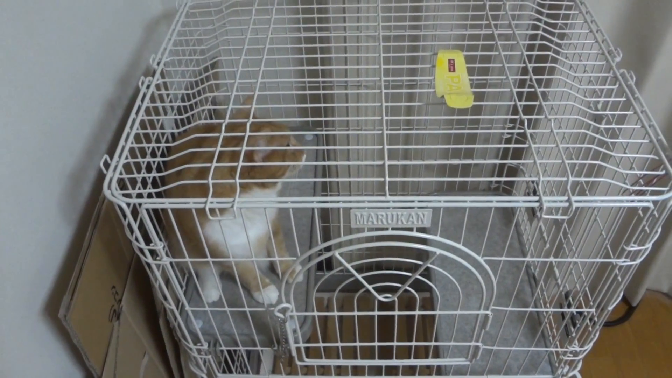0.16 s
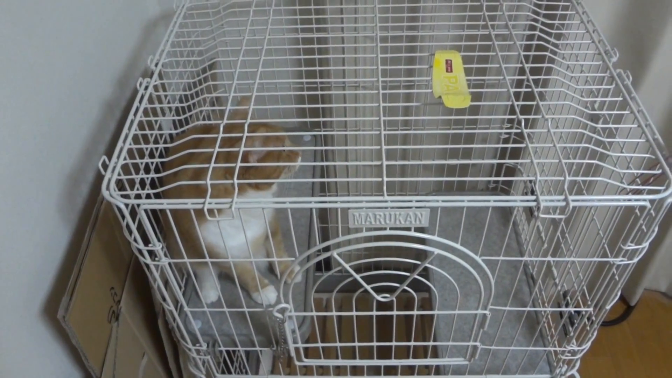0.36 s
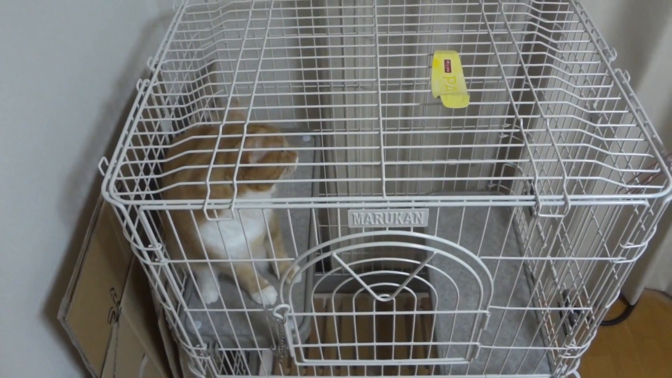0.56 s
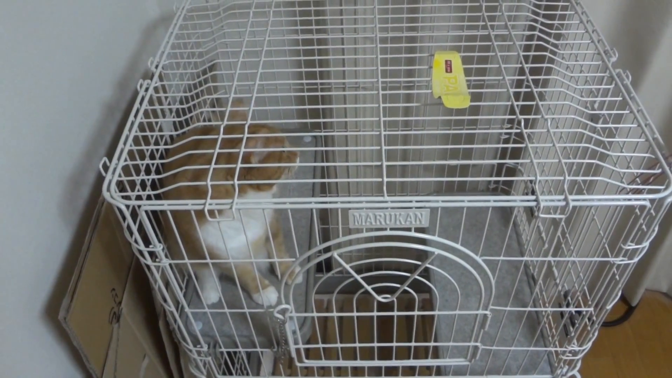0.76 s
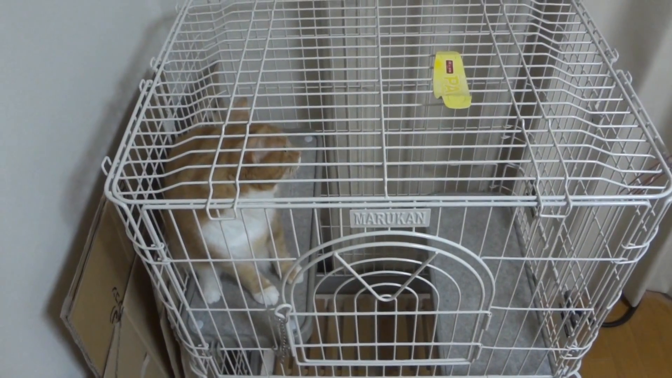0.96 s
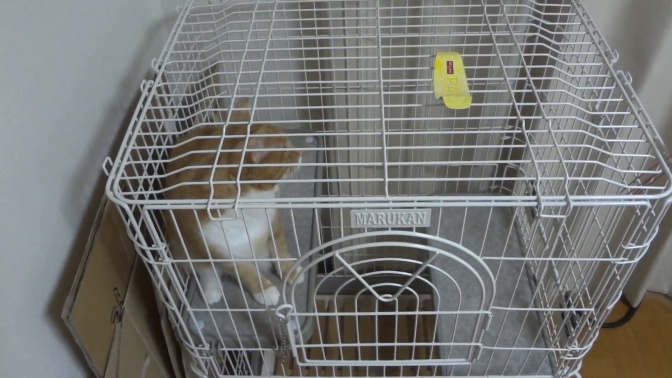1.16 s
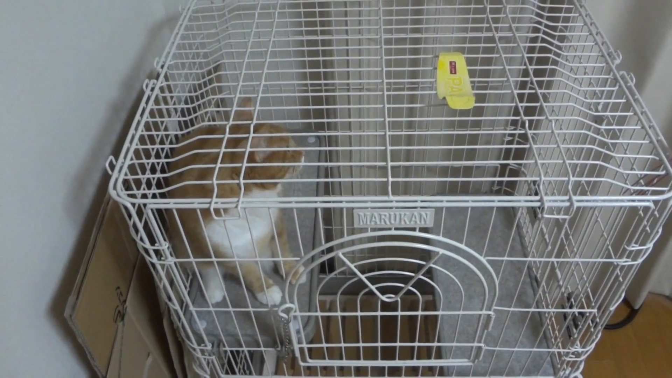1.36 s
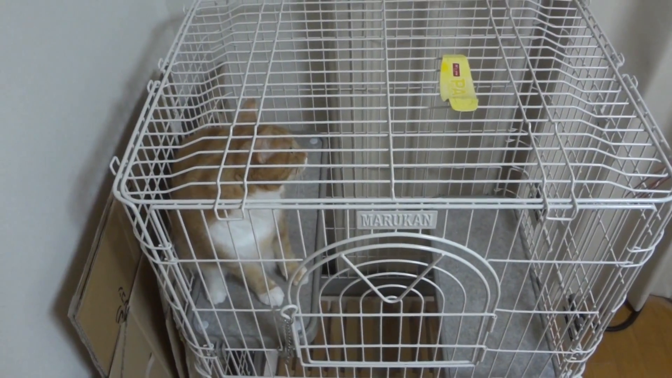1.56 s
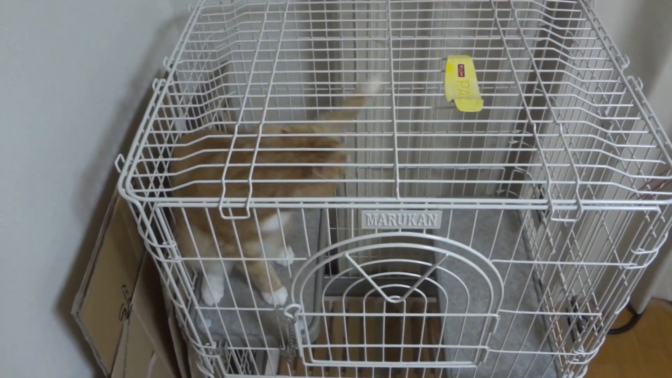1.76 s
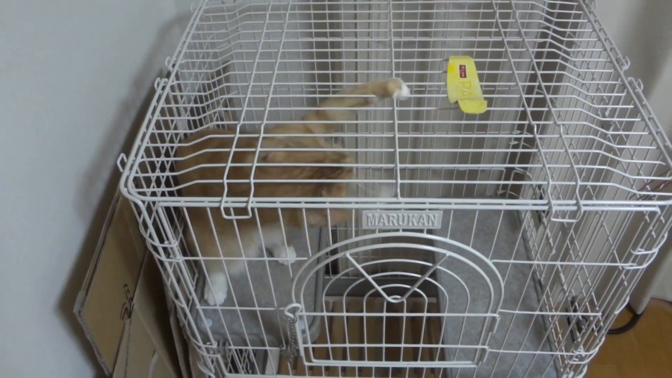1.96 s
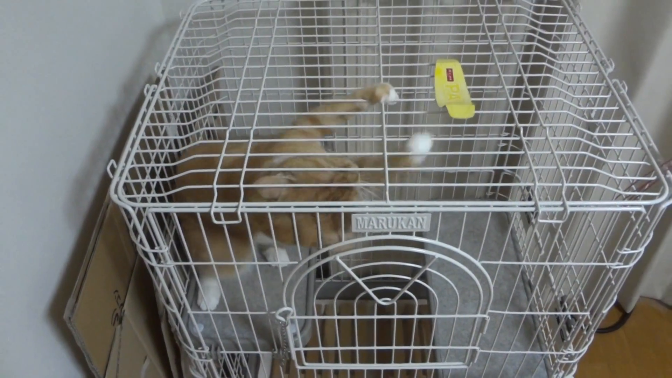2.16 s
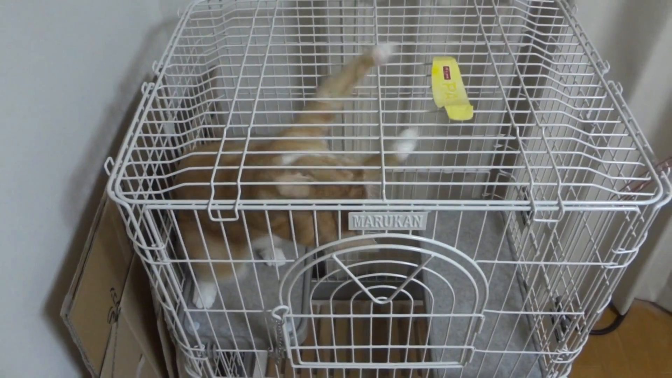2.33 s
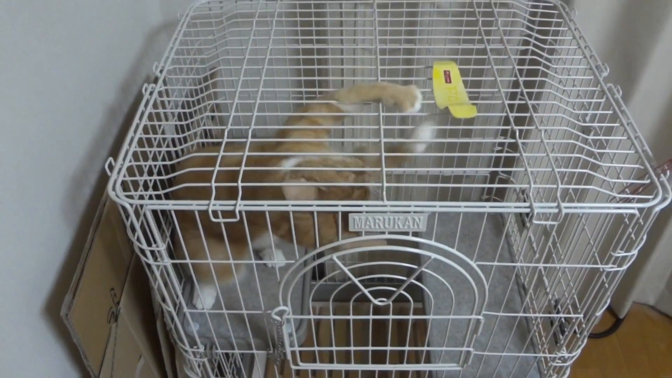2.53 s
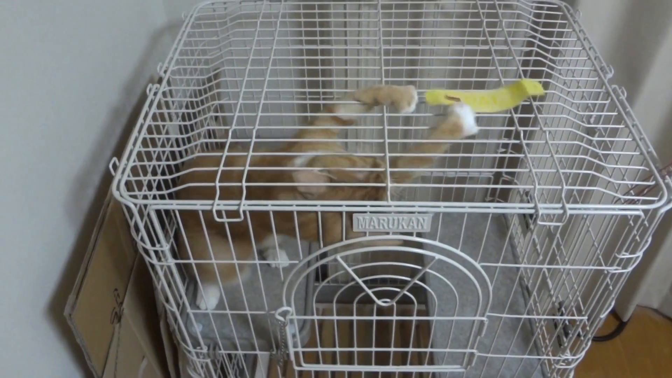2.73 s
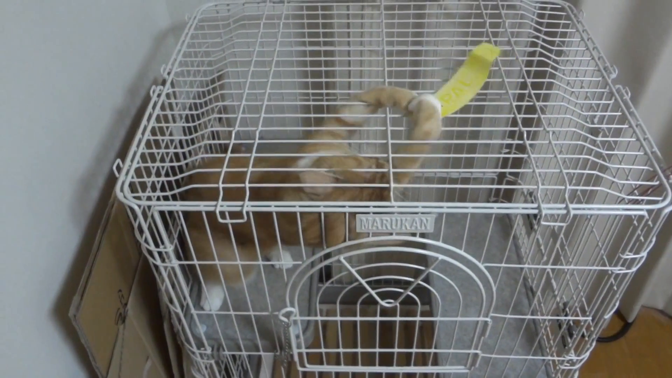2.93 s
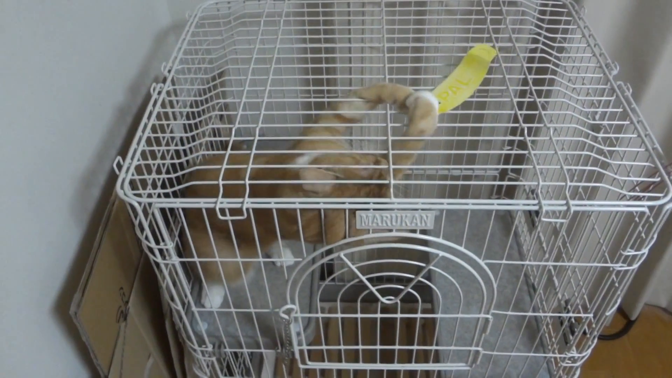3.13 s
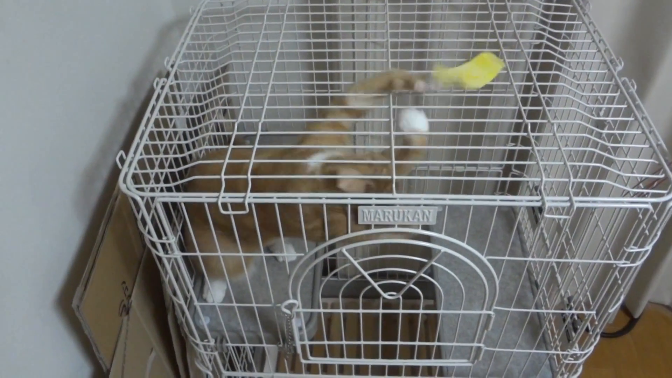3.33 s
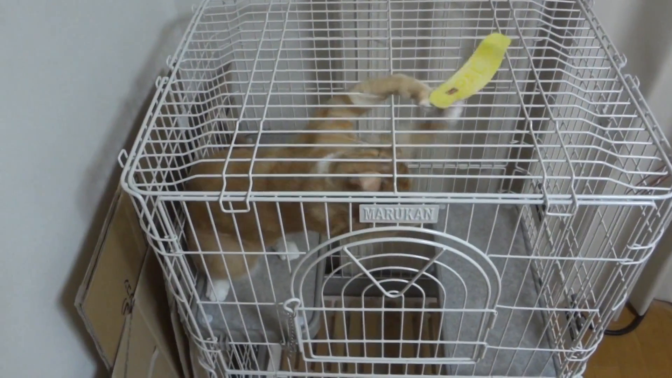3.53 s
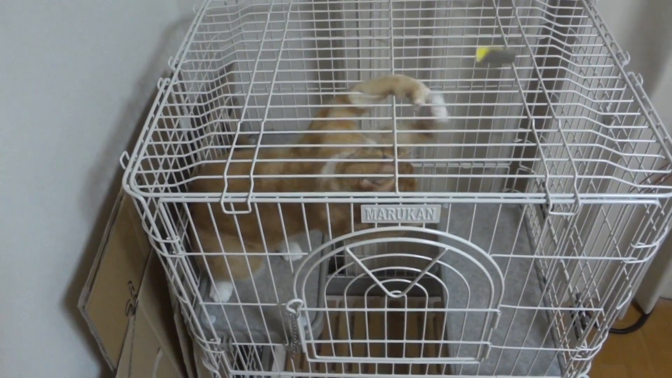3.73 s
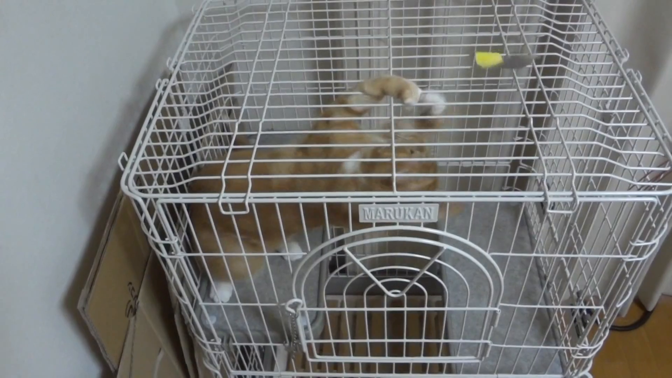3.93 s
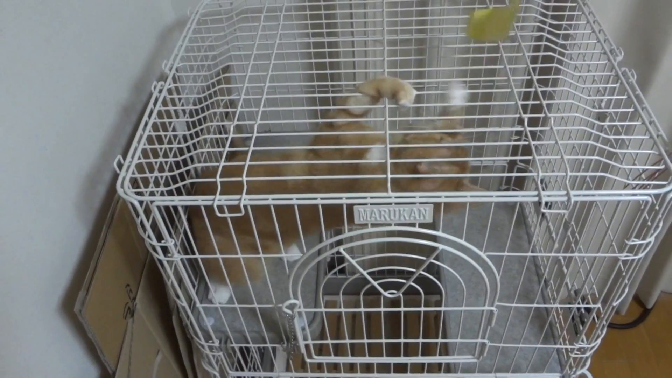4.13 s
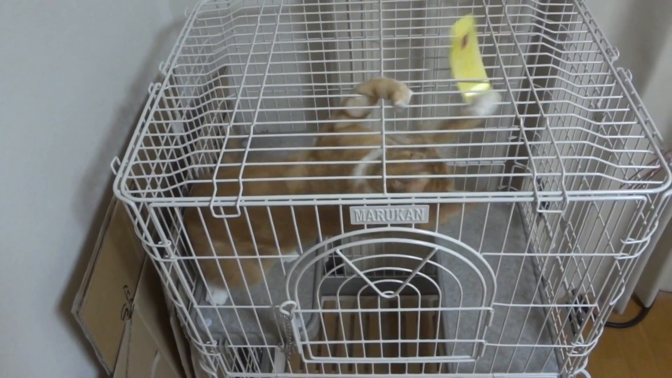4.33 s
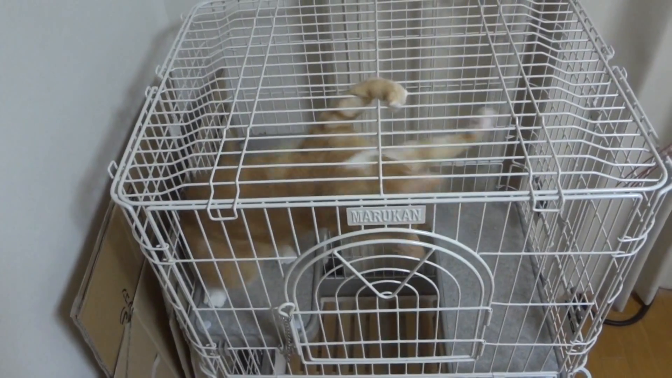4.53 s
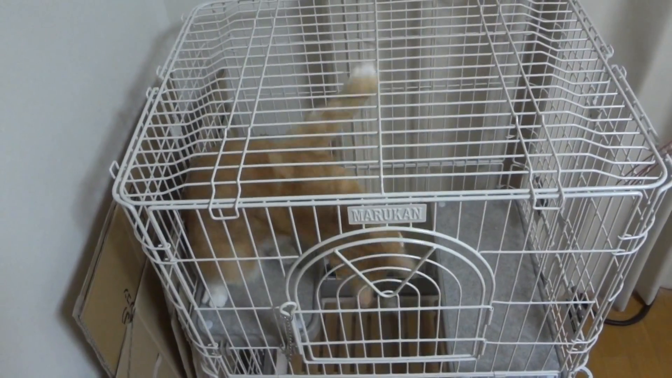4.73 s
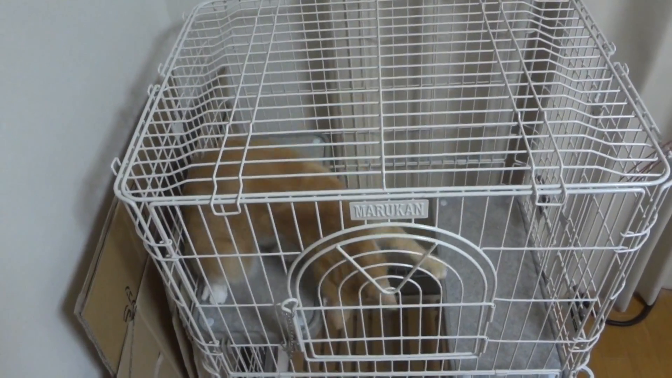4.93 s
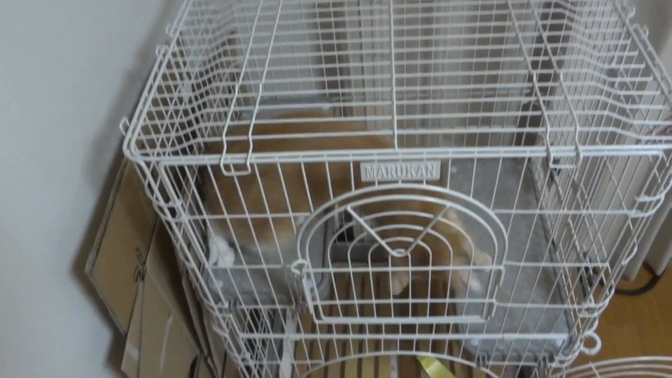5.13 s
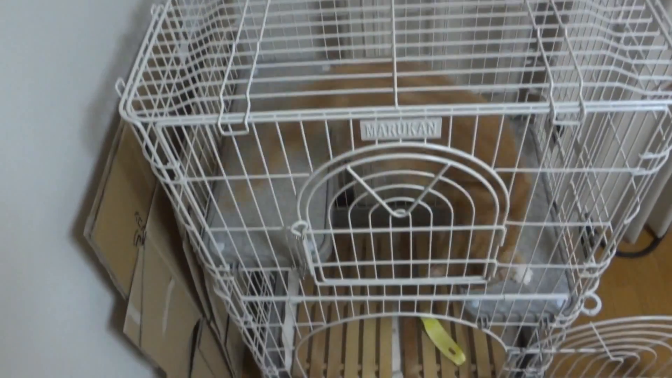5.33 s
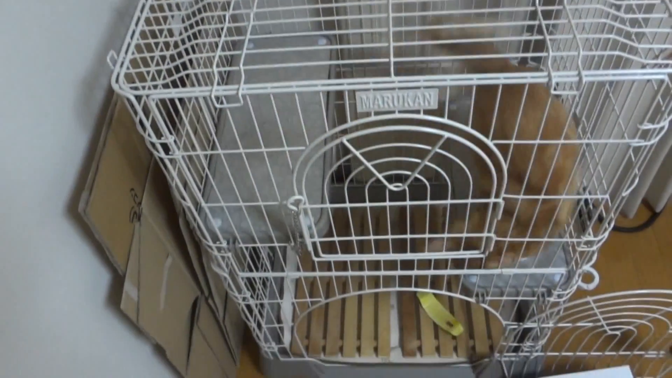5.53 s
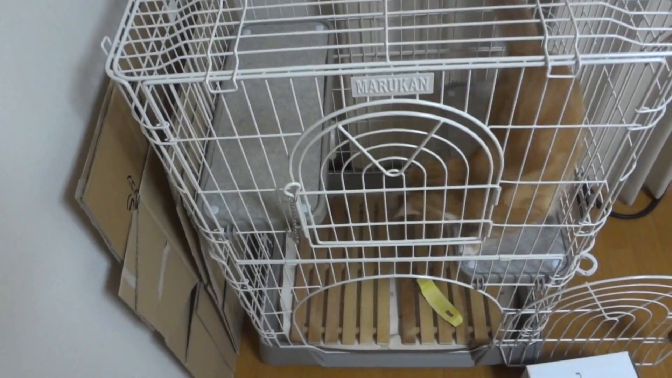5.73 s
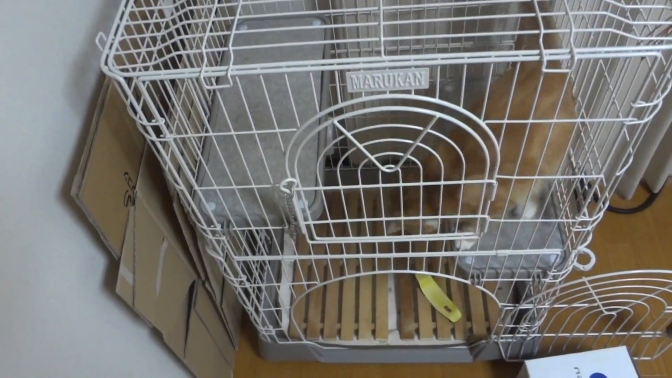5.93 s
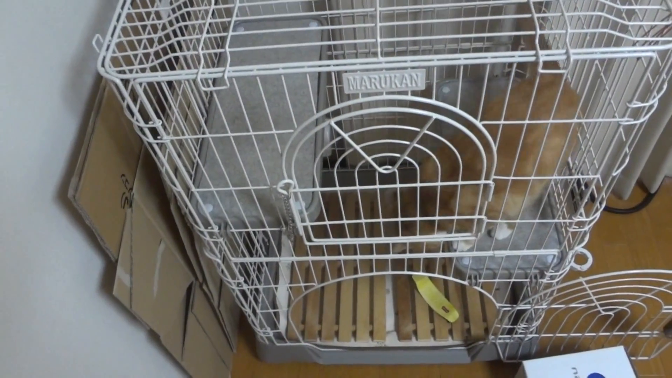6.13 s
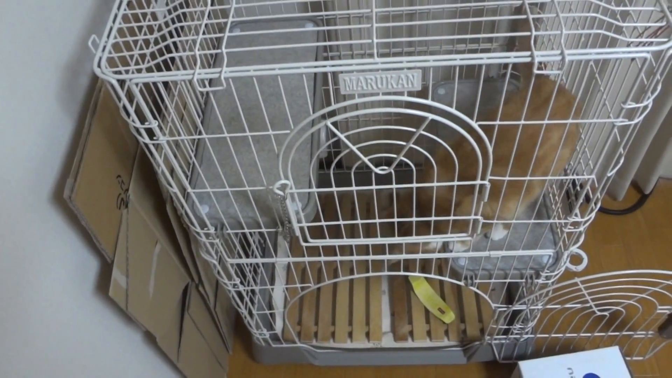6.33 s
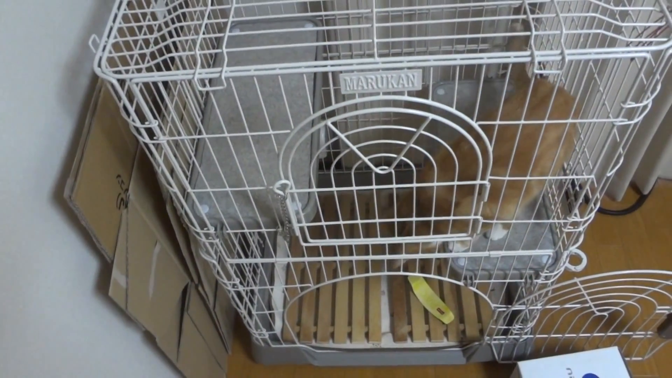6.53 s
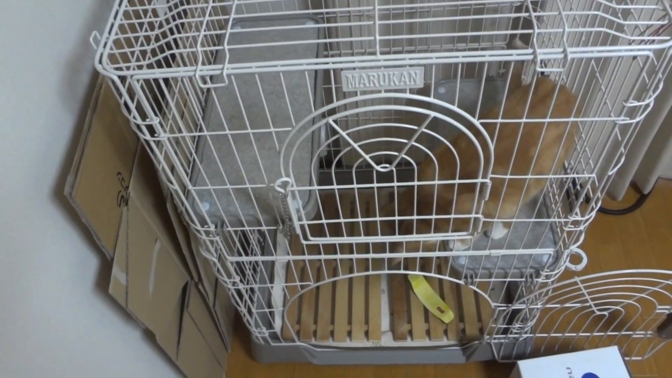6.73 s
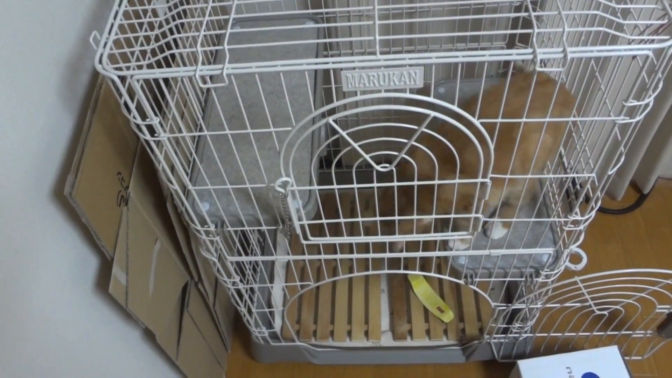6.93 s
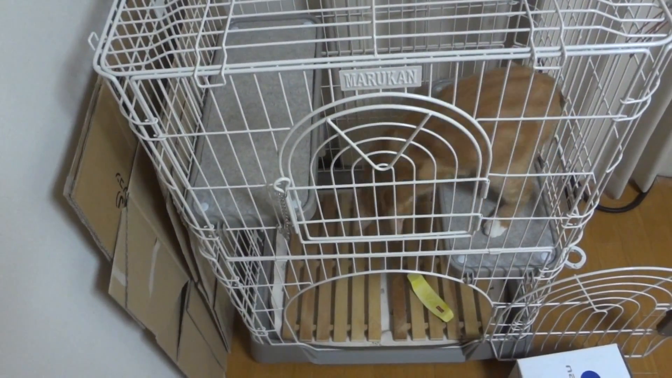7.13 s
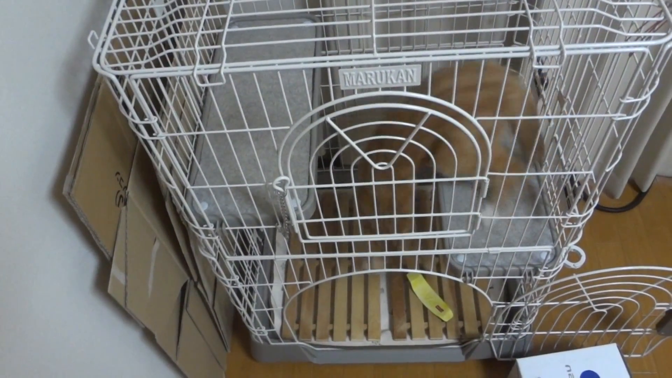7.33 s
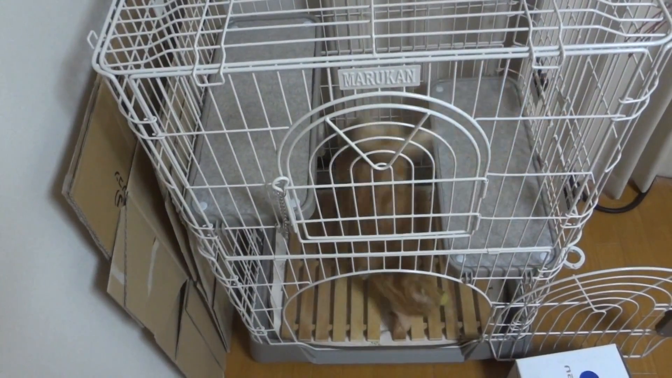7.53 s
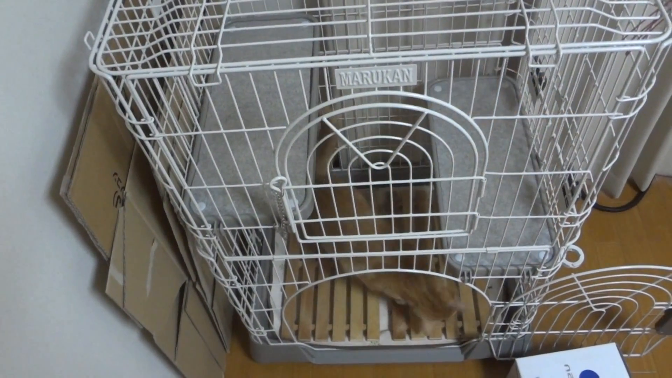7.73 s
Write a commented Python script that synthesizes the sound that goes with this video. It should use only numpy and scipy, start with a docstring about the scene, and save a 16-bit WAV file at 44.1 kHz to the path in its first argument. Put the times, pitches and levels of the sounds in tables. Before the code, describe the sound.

In a quiet room, a cat moves inside a wire cage close to the microphone. After a faint shove and a pause, its weight makes the frame boom and wires clang. Claws and a plastic strip snap brightly against the bars while loose joints jangle. It clambers down with hollow shelf thuds, the ringing fades to near silence, then small rattles lead to a strong, dry knock.

```python
"""A quiet room with a wire cage close to a camera with two microphone ports; a cat is on top of the cage.
Over steady room tone come a faint first shove, then heavier ones: the frame booms, shelves thud, wires clang and sing.
Next the cat paws at a plastic strip lying on top: claws and strip snap on the bars, and loose joints jangle.
It then climbs down over the shelves, which knock hollowly, and a last strong knock comes near the end.
Ringing parts are decaying modes or shaped noise; snaps are short pulses with a rattle and an echo."""
import sys
import numpy as np
from scipy import signal
from scipy.fft import rfft, irfft, next_fast_len
from scipy.io import wavfile

SR = 44100
rng = np.random.default_rng(int(sys.argv[2]) if len(sys.argv) > 2 else 0)


def file_out(sig):
    """Save sig as 16-bit WAV at sys.argv[1]."""
    # one column per channel
    cols = np.atleast_2d(sig).T
    # limit, then scale
    lim = np.clip(cols, -1, 1)
    pcm = np.round(lim * 32767).astype(np.int16)
    wavfile.write(sys.argv[1], SR, pcm)


N = 347508  # length in samples


def amp(db):
    """Decibels to gain."""
    return 10 ** (np.asarray(db) / 20)


def unit(x):
    """Scale to rms 1."""
    return x / np.sqrt(np.mean(x ** 2) + 1e-20)


def along(points, hz):
    """(frequency_hz, value) points read on a log frequency axis."""
    point_hz, value = np.transpose(points)
    return np.interp(np.log(hz + 1), np.log(point_hz + 1), value)


def filtered(x, response):
    """x times a complex response of frequency."""
    size = next_fast_len(N + SR // 2)
    spectrum = rfft(x, size) * response(np.fft.rfftfreq(size, 1 / SR))
    return irfft(spectrum, size)[..., :N]


def wobble(steps, count=4096):
    """A random curve with one knot per whole step."""
    return np.interp(steps, np.arange(count), rng.standard_normal(count))


def add(track, s, sound):
    """Mix a sound into a track at time s."""
    start = max(round(s * SR), 0)
    room = track[..., start:start + sound.shape[-1]]
    room += sound[..., :room.shape[-1]]


def left_right(pair):
    """(mid, side) to (left, right)."""
    mid, side = pair
    return np.array([mid + side, mid - side])


# colour of the room tone: frequency_hz, density_db (dB per Hz, relative)
ROOM_COLOUR = [(12, -58), (20, -7.5), (53, -4), (120, -9), (210, -5.5), (285, -7.5), (319, -2), (357, -5.5),
               (1810, -17), (2080, -16.5), (2600, -20.5), (5000, -31), (13900, -39), (16000, -44)]
# how alike the room tone is at the two ports: frequency_hz, likeness (-1 to 1)
ROOM_LIKENESS = [(60, 0.96), (180, 0.49), (550, -0.38), (1650, -0.17), (4970, 0.45), (15000, 1)]
ROOM_DB = -58.5  # rms of the mid part


def room_tone():
    """The steady hush of the room: coloured noise split into (mid, side) by its left-right likeness."""
    def response(hz):
        turn = np.arccos(np.clip(along(ROOM_LIKENESS, hz), -1, 1)) / 2
        return amp(along(ROOM_COLOUR, hz)) * [np.cos(turn), np.sin(turn)]

    air = filtered(rng.standard_normal((2, N)), response)
    return amp(ROOM_DB) * air / np.std(air[0])


def ring(hits, modes, scatter_db, waver):
    """Separate decaying modes, struck at new strengths and phases; the shifting load bends their pitch.

    hits: start_s, rise_s, level_db, pitch_hz, emphasis_db; waver: phase bend in radians."""
    t = np.arange(3 * SR) / SR
    hz, db, t60 = np.transpose(modes)
    bend = waver * np.array([wobble(t[::100] * 14) for _ in hz]).repeat(100, axis=1)
    fades = amp(-60 * t / t60[:, None])
    waves = (fades * np.exp(1j * (2 * np.pi * hz[:, None] * t + bend))).astype(np.complex64)
    out = np.zeros(N)
    for s, rise, level, pitch_hz, emphasis_db in hits:
        spot = emphasis_db / (1 + (np.log(hz / pitch_hz) / 0.2) ** 2)
        size = amp(db + spot + scatter_db * rng.standard_normal(len(hz)))
        phase = np.exp(2j * np.pi * rng.random(len(hz)))
        strike = (size / np.linalg.norm(size) * phase).astype(np.complex64)
        onset = 1 - np.exp(-t / max(rise, 1e-4))
        add(out, s, np.sqrt(2) * amp(level) * (strike @ waves).real * onset)
    return out


# crowded modes of the cage: frequency_hz, density_db (dB per Hz, relative)
CAGE_COLOUR = [(65, -47), (110, -13.5), (223, -8.5), (269, -6.5), (444, 2.5), (547, 0.5), (607, -4),
               (780, -9), (884, -12), (1720, -23), (2080, -17), (2720, -22), (5650, -26), (13500, -36.5),
               (16000, -39)]
# where panel modes bunch up or thin out: centre_hz, width_hz, change_db
MODE_BUNCHES = [(147.6, 13, 7.5), (219.9, 10.8, 11.5), (371.2, 7.3, 13.5), (430, 33, 1), (624.5, 8.9, 9),
                (1136, 430, 7), (2210, 370, -4), (4500, 790, 2), (5320, 530, -6), (5560, 400, 5),
                (1520, 310, 0.5)]


def clang(hits, lo_hz, hi_hz, t60, lines_db, own_lines_db, spacing_hz,
          chatter_db, chatter_rate, side_db, punch, size=SR):
    """Modes too crowded to count, as decaying noise in (mid, side), excited anew by each hit.

    hits: start_s, rise_s, level_db, pitch_hz, emphasis_db."""
    t, hz = np.arange(size) / SR, np.fft.rfftfreq(size, 1 / SR) + 0.00093  # keeps clear of 0 Hz
    bunches = sum(db / (1 + (2 * (hz - centre) / width) ** 2) for centre, width, db in MODE_BUNCHES)
    band = 1 / np.sqrt((1 + (lo_hz / hz) ** 14) * (1 + (hz / hi_hz) ** 14))
    lines = lines_db * np.tanh(wobble(hz / spacing_hz))
    comb = band * amp(along(CAGE_COLOUR, hz) + bunches + lines)
    out = np.zeros((2, N))
    for s, rise, level, pitch_hz, emphasis_db in hits:
        # each spot of the cage favours its own range and its own groups of modes
        spot = emphasis_db / (1 + (np.log(hz / pitch_hz) / 0.53) ** 2)
        spot = spot + own_lines_db * wobble(hz / (4 * spacing_hz))
        tone = irfft(comb * amp(spot) * rfft(rng.standard_normal((2, size))))
        # the struck part is loudest for a moment, then the energy spreads through the cage
        onset = 1 - np.exp(-t / max(rise, 1e-4))
        shape = onset * amp(-60 * t / t60) * (1 + punch * np.exp(-t / 0.013))
        # the parts keep touching as they swing, so the ring dies unevenly
        hit = tone * shape * amp(chatter_db * wobble(t * chatter_rate))
        add(out, s, amp(level) * hit * np.linalg.norm(shape) / np.linalg.norm(hit[0]))
    return out * amp([[0], [side_db]])


# thin wires plucked in passing: start_s, level_db, pitch_hz
WIRE_PLUCKS = [(1.828, -55, 14000), (2.067, -59, 4050), (2.2, -49, 4230), (2.39, -61, 4230),
               (3.395, -44, 9800), (4.083, -47, 1230), (5.156, -45, 10300)]
# modes of the thin wires: frequency_hz, level_db (relative), t60_s
THIN_WIRE_MODES = [(1114, -6, 1.5), (1233, 0, 2.4), (1297, -4, 1.7), (4043, -5, .36), (4226, 0, .38),
                   (4264, -3, .36), (5685, -2, .27), (7634, -3, .3), (8845, -2, .35), (9265, -2, .22),
                   (10280, -1, .33), (10850, -4, .27), (13200, -3, .33), (14890, -2, .22)]
PLUCK_RISE_S, PLUCK_SPOT_DB = 0.0017, 22  # a pluck reaches mostly the modes near its pitch


def zings():
    """A claw catches a thin wire, which rings on in a few clear modes."""
    hits = [(s, PLUCK_RISE_S, db, hz, PLUCK_SPOT_DB) for s, db, hz in WIRE_PLUCKS]
    return ring(hits, THIN_WIRE_MODES, scatter_db=1.5, waver=1.4)


# the cat throws its weight on the cage: start_s, rise_s, level_db, frame_sway_db, contact_hardness_db,
# change_per_rebound_db, frame_twist_db
WEIGHT_BLOWS = [(0.2, 0.038, -42.5, -23, -13, -3.5, 4), (1.683, 0.0032, -55, -18, -6, 4.5, 0),
                (1.842, 0.045, -25, 0, 1, -2.5, 8), (2.12, 0.0048, -46, 8, 1, 2.5, -2),
                (2.209, 0.02, -38.5, -2.5, 6.5, 1, 0), (2.427, 0.012, -26.5, 3.5, 6, 0.5, 8.5),
                (3.02, 0.04, -38, -8.5, 1, -8, 3), (3.395, 0.034, -32.5, 0, 4, -0.5, -6),
                (3.702, 0.12, -31.5, -1, 3, -9, -4), (3.845, 0.029, -25, -14, 7.5, -6.5, 3),
                (4.75, 0.026, -31, 3, -0.5, 1.5, -7), (5.155, 0.0014, -29, -12, 5, -5.5, 11),
                (5.26, 0.029, -24, -14, 1, -8.5, -7), (5.515, 0.0059, -37.5, -4, -5, -13, 0),
                (5.537, 0.00085, -25.5, -14.5, 1, -39, -2), (5.785, 0.00087, -43.5, -8, -2, -1, 6),
                (6.925, 0.014, -50, 8, -3.5, -2, 0), (7.379, 0.027, -45, -11, 4, -19, 7),
                (7.442, 0.0068, -39, 3.5, -11, -2.5, -10.5), (7.652, 0.002, -27.5, -0.5, 0, -6, -2)]
# the cage rocks back twice after each blow: delay_s
REBOUND_DELAYS = [0.044, .125]
REBOUND_RISE_S = 0.045


def shoves():
    """Each blow and the rocking after it: rows of start_s, rise_s, level_db, sway_db, hardness_db."""
    rows = []
    for s, rise, db, sway, hardness, change, _ in WEIGHT_BLOWS:
        rows.append((s, rise, db, sway, hardness))
        for count, delay in enumerate(REBOUND_DELAYS, start=1):
            rows.append((s + delay, REBOUND_RISE_S, db + change * count, sway, hardness))
    return rows


# a hooked joint slips under the load: start_s, rise_s, clank_level_db, sizzle_over_clank_db, pitch_hz
JOINT_SLIPS = [(1.827, 0.0025, -57, 14, 14000), (1.838, 0.01, -54, 9.5, 6500), (1.96, 0.0092, -53, 1, 8800),
               (1.87, 0.066, -37.5, -9, 4180), (2.066, 0.0097, -47, -7.5, 4100),
               (2.199, 0.0088, -41, -7.5, 14000), (2.421, 0.0036, -47, -6.5, 12000),
               (2.437, 0.0058, -38.5, -18, 1730), (2.571, 0.025, -35.5, -11, 1794),
               (2.707, 0.0051, -47, -5, 12000), (2.755, 0.0086, -37, -22, 1400),
               (3.23, 0.044, -56, -2, 4660), (3.391, 0.013, -33, -1.5, 3900),
               (3.396, 0.0068, -46.5, 8.5, 11000), (3.712, 0.0015, -42.5, -7.5, 1810),
               (3.775, 0.0064, -45.5, -2, 1810), (3.841, 0.0039, -26.5, -8.5, 2570),
               (3.885, 0.014, -37, -16, 2980), (4.748, 0.0057, -47, -4, 4440),
               (5.142, 0.003, -39, -8, 7000), (5.155, 0.0024, -42.5, -1, 10000),
               (5.275, 0.033, -40.5, -17.5, 1660), (5.353, 0.003, -42.5, -3, 14100),
               (5.5, 0.011, -51, -4, 9000), (5.537, 0.00074, -49.5, -6, 1500),
               (5.735, 0.0023, -48, -20, 3864), (6.85, 0.0017, -66.5, -4, 1900),
               (6.98, 0.023, -56.5, -7, 1780), (7.376, 0.023, -51, -5, 3020),
               (7.426, 0.009, -44.5, -8, 2750), (7.445, .012, -44.5, -16, 1600), (7.52, .02, -55, -3, 5000),
               (7.645, 0.02, -42, -4, 2740)]
# claws and strip snap on a bar: start_s, level_db, pitch_hz, panel_ring_db
BAR_SNAPS = [(2.453, -32, 6000, -50.5), (2.723, -29.5, 4400, -45), (2.764, -29, 3550, -44),
             (2.771, -26, 3200, -42), (2.798, -36, 2990, -67), (2.8559, -30, 3280, -49.5),
             (2.874, -33, 3598, -52.5), (2.8991, -8, 2320, -32.5), (2.904, -12, 5750, -39.5),
             (3.3839, -25, 3250, -72), (3.5427, -23, 3140, -48), (3.5484, -32, 3570, -53),
             (3.5779, -12, 2750, -32.5), (3.6479, -27, 5963, -49.5), (3.669, -25.5, 3480, -48),
             (3.751, -36, 6500, -53.5), (3.7952, -37, 5000, -50), (3.9925, -19, 2770, -41.5),
             (4.06, -35, 6190, -50.5), (4.0811, -12, 3400, -39.5), (4.085, -15, 1330, -54),
             (4.0864, -16.5, 5300, -40.5), (4.2623, -19, 3420, -45.5), (4.32, -10, 4840, -39),
             (4.4388, -29, 1780, -49.5), (4.6607, -19.5, 2100, -41.5), (4.682, -24.5, 2420, -44.5),
             (4.858, -37, 3440, -51.5), (4.972, -18.5, 2510, -36.5), (4.973, -22, 4600, -46.5),
             (5.141, -28, 3500, -44), (5.156, -22, 5640, -44), (5.164, -24, 3280, -47.5),
             (5.22, -19, 1800, -39.5), (5.224, -26, 6050, -53), (5.268, -32, 5500, -50),
             (5.732, -30.5, 3560, -79), (7.424, -26.5, 3620, -45), (7.442, -28, 2650, -43.5),
             (7.471, -28.5, 3600, -50.5)]
JOINTS_DB, JOINTS_HARDEN = -15.5, 0.26  # over the shove at neutral hardness; dB per dB of hardness
CHATTER_HZ, SIZZLE_DB = 2470, -12  # shaken joints: pitch, sizzle over clank
SNAP_RISE_S = 0.00024  # at the struck bar
SNAP_HZ, SNAP_SIZZLE_DB = 3100, -9.5  # sizzle over clank for a snap at this pitch
SIZZLE_DB_PER_OCTAVE = 8  # higher snaps sizzle more


def chatter():
    """Joints sound when they slip, are shaken by a shove or a bar is snapped: rows like JOINT_SLIPS."""
    shaken = [(s, rise, db + JOINTS_DB + JOINTS_HARDEN * hardness, SIZZLE_DB, CHATTER_HZ)
              for s, rise, db, _, hardness in shoves()]
    snapped = []
    for s, _, hz, ring_db in BAR_SNAPS:
        sizzle_db = SNAP_SIZZLE_DB + SIZZLE_DB_PER_OCTAVE * np.log2(hz / SNAP_HZ)
        snapped.append((s, SNAP_RISE_S, ring_db, sizzle_db, hz))
    return JOINT_SLIPS + shaken + snapped


JOINT_SPOT_DB, SIZZLE_SPOT_DB = 11, 8.5  # emphasis of the pitch in clank and sizzle
SIZZLE_HZ = 7350  # the sizzle of a low joint gathers here
JOINT_LINES_DB = 2.4  # a joint has so many modes that few stand out: their scatter


def jangles():
    """Steel chatters on steel where the panels are hooked together: a clank with a sizzle above it."""
    rows = chatter()
    clank = [(s, rise, db, hz, JOINT_SPOT_DB) for s, rise, db, _, hz in rows]
    sizzle = [(s, rise, db + bright, max(hz, SIZZLE_HZ), SIZZLE_SPOT_DB)
              for s, rise, db, bright, hz in rows]
    out = clang(clank, lo_hz=1320, hi_hz=5500, t60=0.46, lines_db=3.5, own_lines_db=JOINT_LINES_DB,
                spacing_hz=16, chatter_db=2.0, chatter_rate=240, side_db=-14.0, punch=0.1, size=SR // 2)
    out += clang(sizzle, lo_hz=5660, hi_hz=17000, t60=0.36, lines_db=5.0, own_lines_db=JOINT_LINES_DB,
                 spacing_hz=34.7, chatter_db=1.5, chatter_rate=220, side_db=-22.0, punch=0.11, size=SR // 2)
    return out


# a shelf knocks on its supports: start_s, level_db, pitch_hz, t60_s
SHELF_KNOCKS = [(1.847, -22, 400, .09), (1.89, -23, 500, .1), (2.436, -20, 960, .06),
                (2.439, -22, 400, .08), (2.452, -22, 355, .16), (2.47, -24, 530, .1),
                (2.628, -24, 440, .07), (3.856, -22, 865, .13), (3.86, -22, 360, .12),
                (3.87, -22, 708, .16), (3.88, -23, 1070, .12), (3.895, -24, 870, .12),
                (4.003, -28, 460, .1), (4.11, -31, 214, .09), (4.661, -30, 200, .1), (4.809, -28, 440, .09),
                (4.887, -27, 400, .08), (5.163, -20.5, 380, .08), (5.166, -23, 630, .07),
                (5.266, -23, 440, .09), (5.311, -23, 290, .1), (5.5355, -16.5, 205, .1),
                (5.539, -23, 650, .13), (5.55, -18, 156, .12), (5.567, -18, 445, .22),
                (6.928, -31, 190, .11), (7.6565, -9, 320, .055), (7.656, -21, 790, .1),
                (7.673, -21, 510, .08)]
# the shelf's own low modes, left ringing by a knock: frequency_hz, level_db (relative), t60_s
SHELF_OWN_MODES = [(156, -2, 0.33), (221.5, 0, 0.25), (291, -10.5, 0.76)]
SHELF_RING_DB = -12  # under the level of a low knock
BOOM_HZ, BOOM_RISE_S = 287, 0.0011  # knocks above this pitch barely move the whole shelf


def knocks(overtone=2.285, overtone_db=-9, overtone_t60=0.023):
    """The shelf itself gives a short hollow note; low knocks leave its own modes ringing."""
    t, out = np.arange(SR // 3) / SR, np.zeros(N)
    hits = []
    for s, db, pitch_hz, t60 in SHELF_KNOCKS:
        turn = 2 * np.pi * pitch_hz * t
        note = np.sin(turn) + amp(overtone_db - 60 * t / overtone_t60) * np.sin(overtone * turn)
        add(out, s, amp(db - 60 * t / t60) * (1 - np.exp(-t / 0.0042)) * note)
        ring_db = db + SHELF_RING_DB - 10 * np.log10(1 + (pitch_hz / BOOM_HZ) ** 4)
        hits.append((s, BOOM_RISE_S, ring_db, pitch_hz, 0))
    return out + ring(hits, SHELF_OWN_MODES, scatter_db=0.0, waver=0.16)


SPREAD_S, SPREAD_DB = 0.04, 2.5  # a snap's ring spreads to the whole cage: rise, level over panel_ring_db
SNAP_SWAY_DB, SNAP_HARDNESS_DB = -7, 4.5
FRAME_LAG_S = 0.0059  # the heavy frame starts more slowly than the wires
TWIST_HZ = 92  # the frame mode that a paw high on one side favours
SPOT_HZ, SPOT_DB = 490, 0  # the range a paw favours, at neutral hardness (harder is higher); its emphasis
SHELF_DB, SHORT_WIRES_DB = -5, -10  # over the long wires, at neutral hardness and sway
SHELF_SOFTENS, SHELF_FOLLOWS_SWAY = 0.43, 0.057  # dB lost per dB of hardness, gained per dB of sway
# the more the frame sways, the more the shelf's lowest range booms: emphasis at no sway, dB per dB
TRAY_HZ, TRAY_DB, TRAY_FOLLOWS_SWAY = 132, 6, 0.76
BOOM_DB, BOOM_SPOT_DB = -19.5, 22  # the shelf booms on around the pitch of a knock: level, emphasis


def shares():
    """How shoves, snaps and knocks divide among frame, shelf, long and short wires: four lists of hits."""
    spread = [(s, SPREAD_S, ring_db + SPREAD_DB, SNAP_SWAY_DB, SNAP_HARDNESS_DB)
              for s, _, _, ring_db in BAR_SNAPS]
    frame = [(s, rise + FRAME_LAG_S, db + sway, TWIST_HZ, twist)
             for s, rise, db, sway, _, _, twist in WEIGHT_BLOWS]
    frame += [(s, rise + FRAME_LAG_S, db + sway, TWIST_HZ, 0) for s, rise, db, sway, _ in spread]
    shelf, long_wires, short_wires = [], [], []
    for s, rise, db, sway, hardness in shoves() + spread:
        spot = SPOT_HZ * amp(hardness), SPOT_DB
        shelf_db = db + SHELF_DB - SHELF_SOFTENS * hardness + SHELF_FOLLOWS_SWAY * sway
        shelf.append((s, rise, shelf_db, TRAY_HZ, TRAY_DB + TRAY_FOLLOWS_SWAY * sway))
        long_wires.append((s, rise, db, *spot))
        short_wires.append((s, rise, db + SHORT_WIRES_DB + hardness, *spot))
    for s, db, hz, _ in SHELF_KNOCKS:
        boom_db = db + BOOM_DB - 10 * np.log10(1 + (hz / BOOM_HZ) ** 2)
        shelf.append((s, BOOM_RISE_S, boom_db, hz, BOOM_SPOT_DB))
    return frame, shelf, long_wires, short_wires


# the whole frame sways: frequency_hz, level_db (relative), t60_s
FRAME_MODES = [(57.47, 9, 0.96), (66.7, 2.5, 0.81), (90.4, 8, 0.66), (110, -5, 0.73)]
# single wires that sing on and beat against each other: frequency_hz, level_db (relative), t60_s
SINGING_WIRES = [(379, 1, 4.0), (400, -1.5, 3.8), (420, 1.5, 5.0), (444, -1, 4.8), (467, -5, 2.6),
                 (496, -1, 2), (605, -3, 1.6), (705, -1, 1.5), (862, -4, 2.0), (896, -5, 1.7),
                 (1225, -8, 1.9), (1389, -6, 1.3), (2344, -12, 2.4)]
SINGING_DB, SINGING_WAVER = -20.7, 1.1  # level over the long wires' hits, phase waver in radians


def blows():
    """Each paw sways the frame, thuds on a shelf and shakes the wire panels, some wires singing on."""
    frame, shelf, long_wires, short_wires = shares()
    out = clang(shelf, lo_hz=126, hi_hz=307, t60=0.73, lines_db=1.0, own_lines_db=3.5, spacing_hz=7.25,
                chatter_db=0.0, chatter_rate=25.0, side_db=-19.0, punch=1.0)
    out += clang(long_wires, lo_hz=297, hi_hz=692, t60=0.67, lines_db=4.5, own_lines_db=2.0, spacing_hz=9,
                 chatter_db=1.0, chatter_rate=63.0, side_db=-12, punch=0.64)
    out += clang(short_wires, lo_hz=703, hi_hz=1790, t60=0.87, lines_db=5.0, own_lines_db=2.5, spacing_hz=11,
                 chatter_db=2.0, chatter_rate=72.7, side_db=-25, punch=0.8)
    out[0] += ring(frame, FRAME_MODES, scatter_db=0.5, waver=1.0)
    out[0] += amp(SINGING_DB) * ring(long_wires, SINGING_WIRES, scatter_db=3.0, waver=SINGING_WAVER)
    return out


# modes of a snapped bar: frequency_hz, level_db (relative), t60_s
BAR_MODES = [(1330, 2.5, 0.026), (2057, -7.5, .09), (2321, 0.5, 0.052), (3287, -2.5, 0.069),
             (3560, -6, 0.028), (4135, -1, 0.057), (4500, -0.5, 0.041), (5610, -2, 0.042), (7900, -9, .04),
             (9900, -5, .04)]
CLINK_DB, CLINK_WIDTH = -15, 0.42  # over the snap's level; range of modes reached (log pitch)


def clinks(contacts, scatter_db=2, detune=0.017):
    """Each contact rings the modes of the bar that lie near its pitch; no two bars are quite alike."""
    t, out = np.arange(SR // 8) / SR, np.zeros(N)
    hz, db, t60 = np.transpose(BAR_MODES)
    fades = amp(-60 * t / t60[:, None])
    for s, level, pitch_hz, _ in contacts:
        tuning, luck = rng.standard_normal((2, len(hz)))
        nearness = 1 / (1 + (np.log(hz / pitch_hz) / CLINK_WIDTH) ** 2)
        size = amp(level + CLINK_DB + db + scatter_db * luck) * nearness
        waves = np.sin(2 * np.pi * np.outer(hz * (1 + detune * tuning), t))
        add(out, s + 0.0005, size @ (fades * waves))
    return out


LOOSE_DB = -50  # a jangle weaker than this throws no wire loose


def bounces(count=7, spread_s=0.05, above_db=2.5, scatter_db=3, fall_db_per_s=95,
            pitch_hz=3900, pitch_spread=0.18):
    """Loose wires touch again after a jangle, weaker the later: rows of start_s, level_db, pitch_hz."""
    rows = []
    for s, _, clank_db, *_ in chatter():
        if clank_db < LOOSE_DB:
            continue
        delay = 0.011 + spread_s * rng.exponential(size=count)
        db = clank_db + above_db - fall_db_per_s * delay + scatter_db * rng.standard_normal(count)
        pitches = pitch_hz * np.exp(pitch_spread * rng.standard_normal(count))
        rows += zip(s + delay, db, pitches)
    return rows


def snaps(contacts, pulse_s=0.00016, width_hz=1900, tick_db=-15, lines_db=4, echo_s=0.0067, echo_db=-9,
          swing_db=-0.5, rattle_db=-13.0):
    """A hard contact: one sharp swing, a brief ring of modes around its pitch, and an echo from the wall."""
    t, hz = np.arange(SR // 10) / SR, np.fft.rfftfreq(SR // 10, 1 / SR) + 1
    fade = amp(rattle_db - 60 * t / 0.03)
    out = np.zeros(N)
    for s, db, pitch_hz, *_ in contacts:
        since = t - 2 * pulse_s
        pulse = np.cos(2 * np.pi * pitch_hz * since) * np.exp(-(since / pulse_s) ** 2)
        hump = 1 / (1 + (np.log(hz / pitch_hz) * pitch_hz / width_hz) ** 2)
        hump = hump + amp(tick_db) * (hz > pitch_hz)
        colour = amp(lines_db * wobble(hz / 260)) * hump / (1 + (hz / 11500) ** 4)
        rattle = unit(irfft(colour * rfft(rng.standard_normal(len(t))), len(t)))
        add(out, s + 0.00054, amp(db - 2.0) * (amp(swing_db) * pulse + fade * rattle))
    # thin bars radiate little bass
    out = signal.sosfilt(signal.butter(3, 1400, "high", fs=SR, output="sos"), out)
    return filtered(out, lambda f: 1 + amp(echo_db) * np.exp(-2j * np.pi * f * echo_s))


# phase between the microphone ports: frequency_hz, left_lead_rad (negative: left lags)
PORT_PHASE = [(60, -0.14), (150, -0.33), (350, -0.58), (950, -0.97), (2200, -0.51), (5000, -0.39),
              (15000, -0.34)]


def scene():
    """The cage reaches the two ports slightly out of phase; the room tone comes from all round."""
    cage = left_right(blows() + jangles())
    cage = cage + knocks() + snaps([*BAR_SNAPS, *bounces()]) + clinks(BAR_SNAPS) + zings()
    at_ports = filtered(cage, lambda hz: np.exp(0.5j * np.outer([1, -1], along(PORT_PHASE, hz))))
    return at_ports + left_right(room_tone())


TOP_HZ = 16000


def record(dry):
    """The camera keeps nothing above its band limit."""
    return filtered(dry, lambda hz: hz < TOP_HZ)


dry = scene()
out = record(dry)
file_out(out)
```